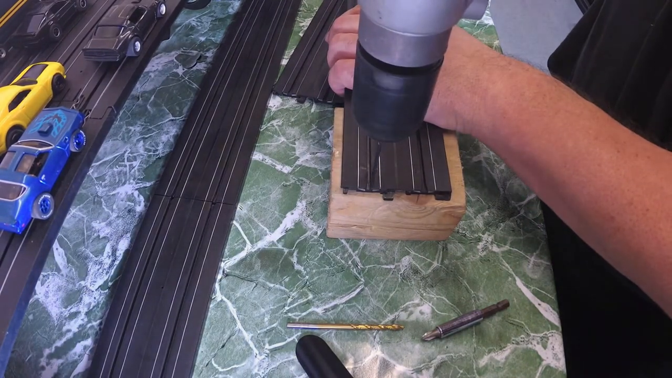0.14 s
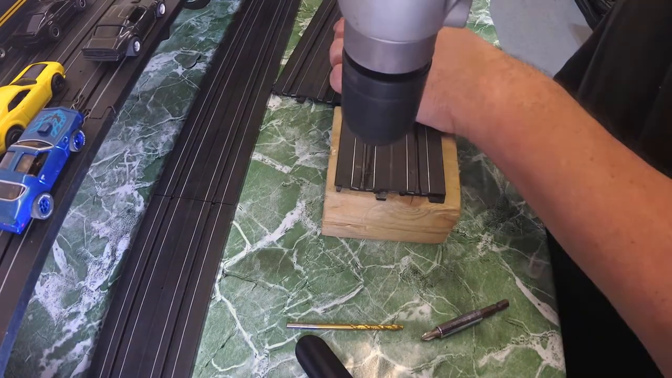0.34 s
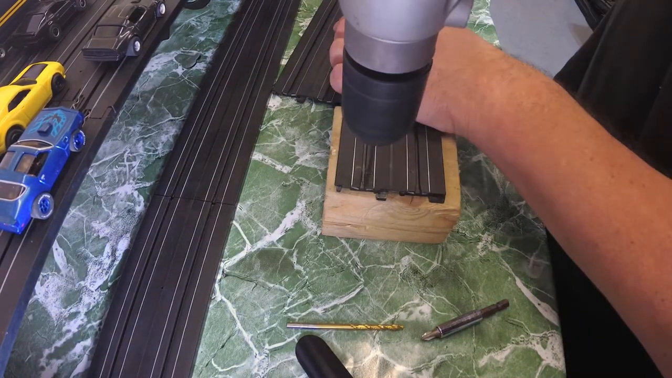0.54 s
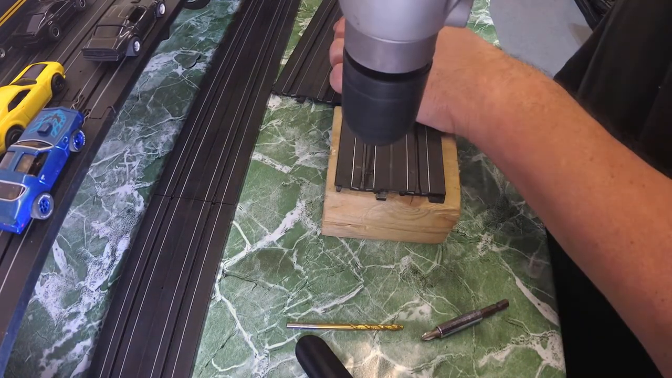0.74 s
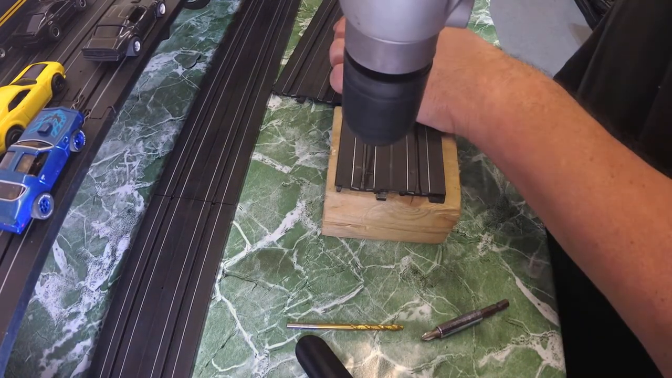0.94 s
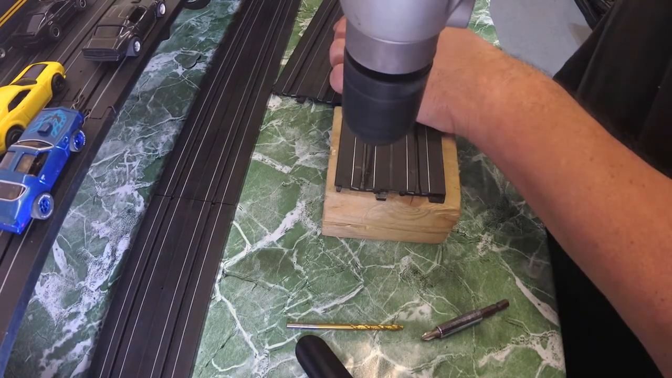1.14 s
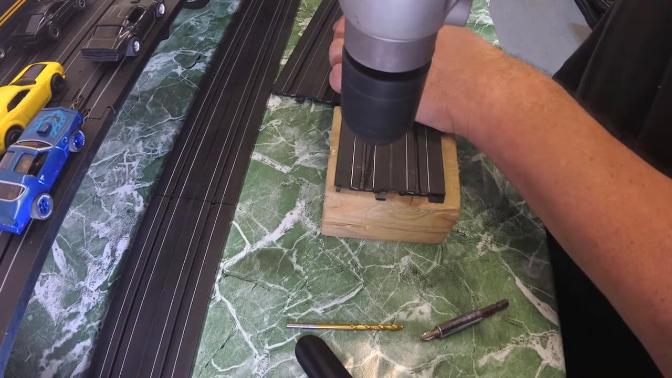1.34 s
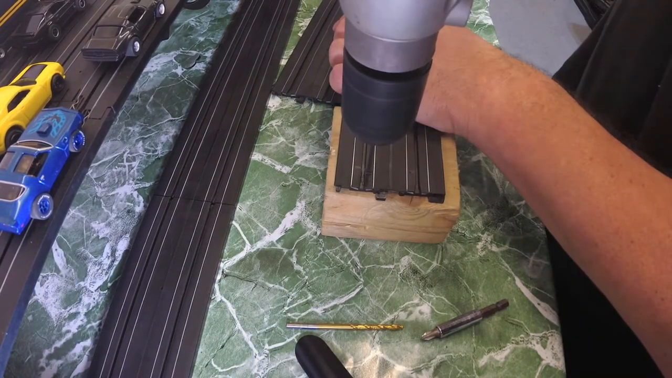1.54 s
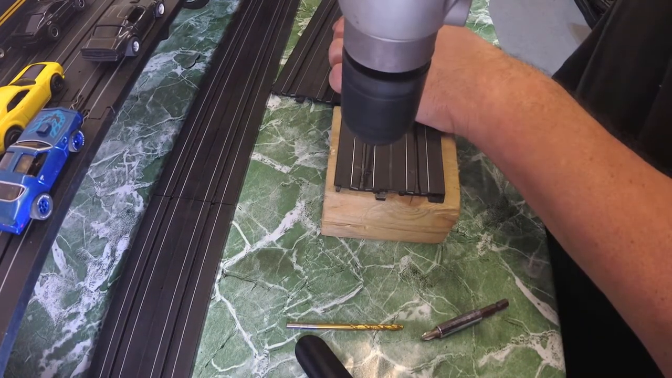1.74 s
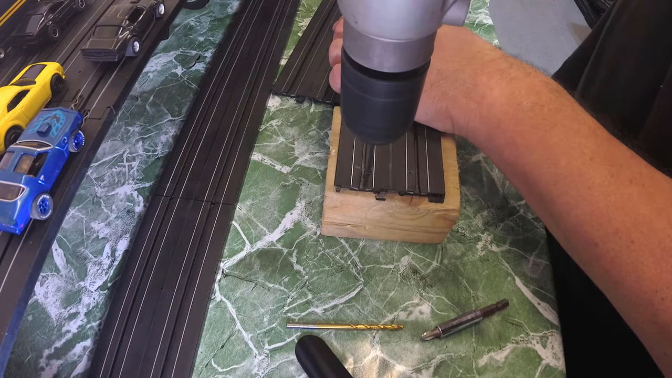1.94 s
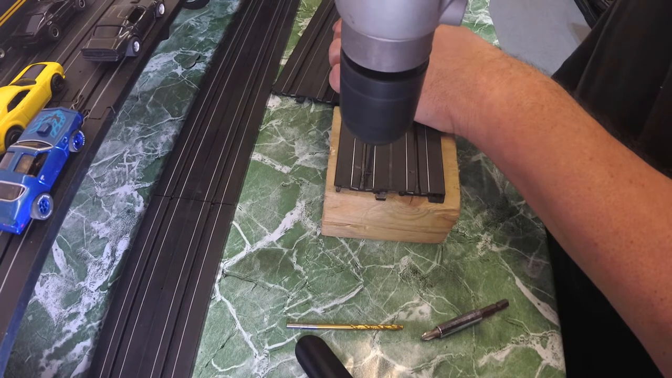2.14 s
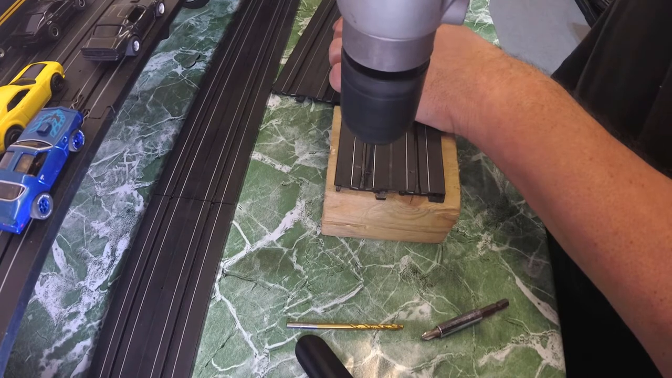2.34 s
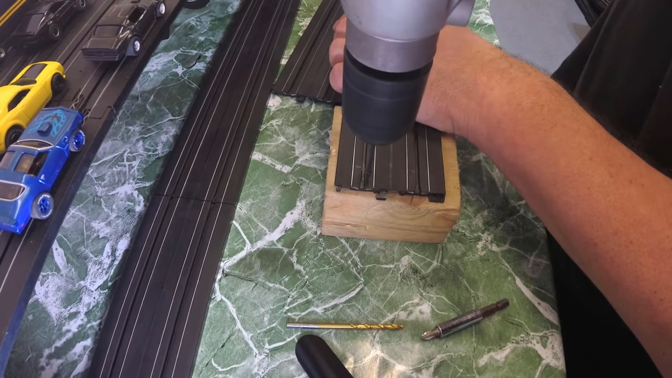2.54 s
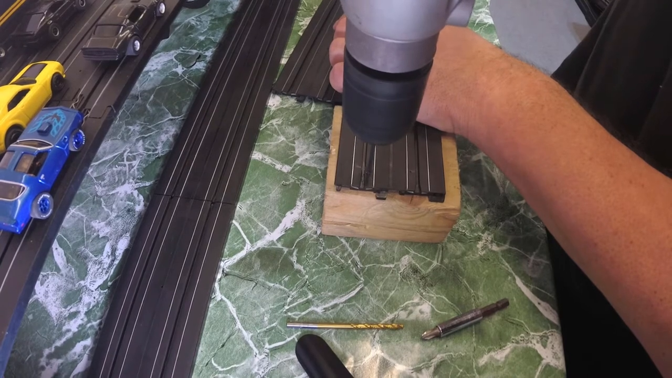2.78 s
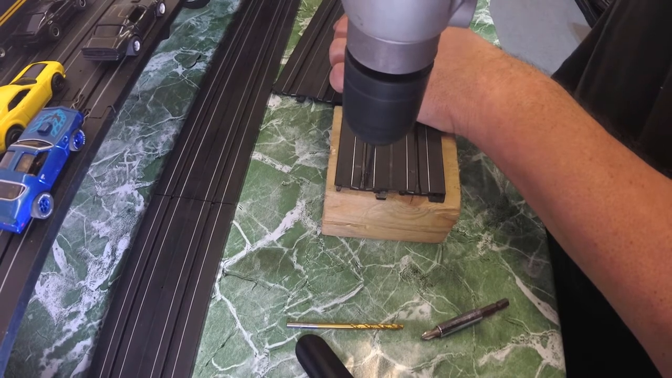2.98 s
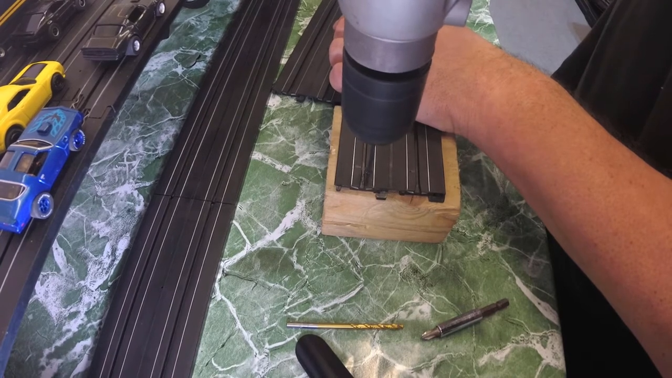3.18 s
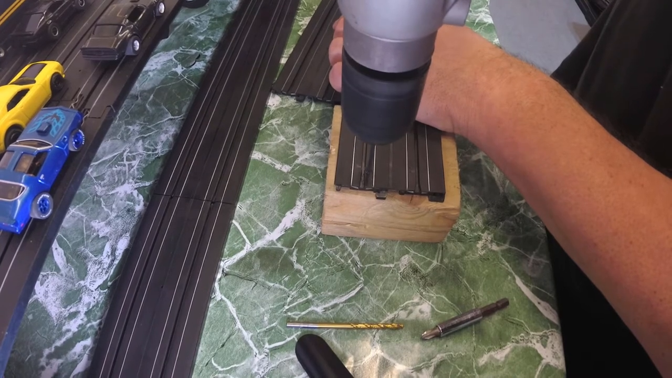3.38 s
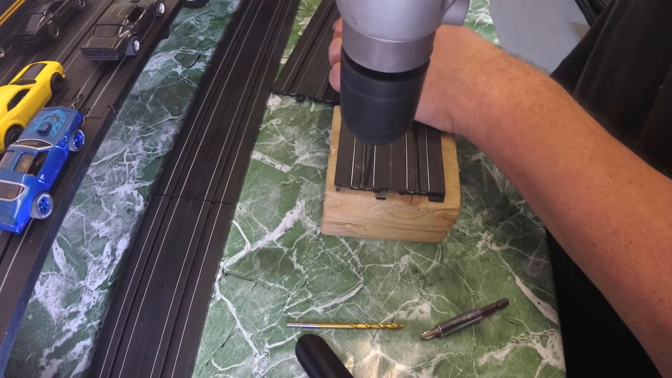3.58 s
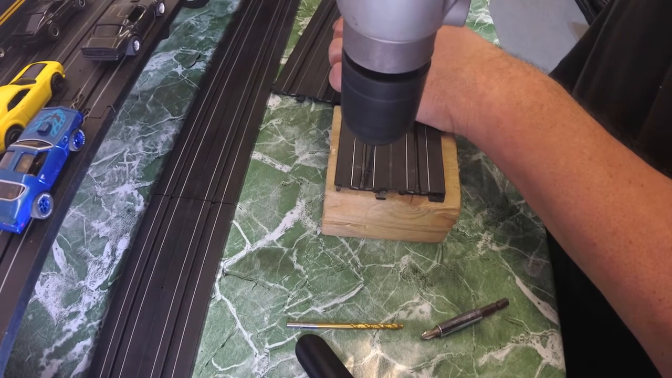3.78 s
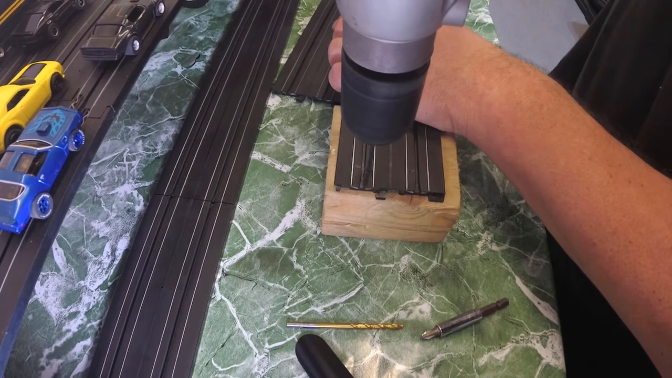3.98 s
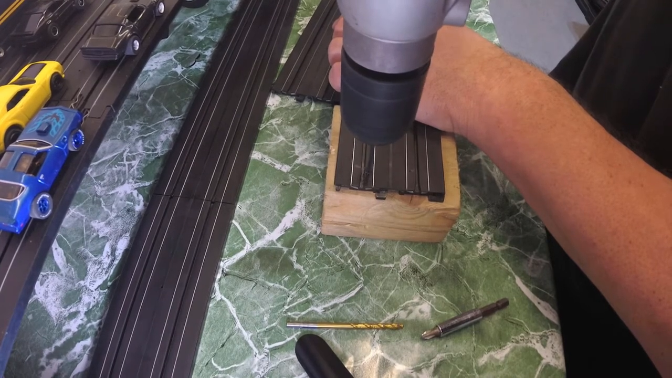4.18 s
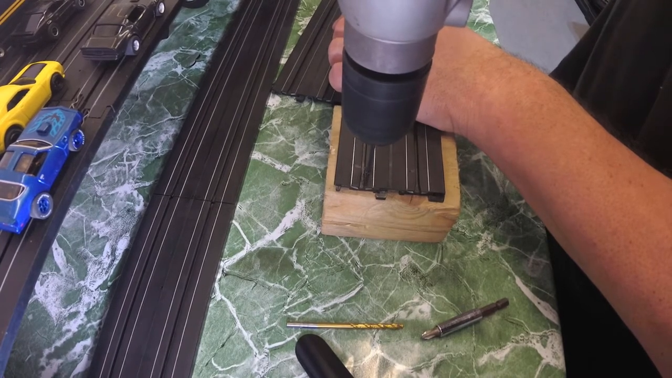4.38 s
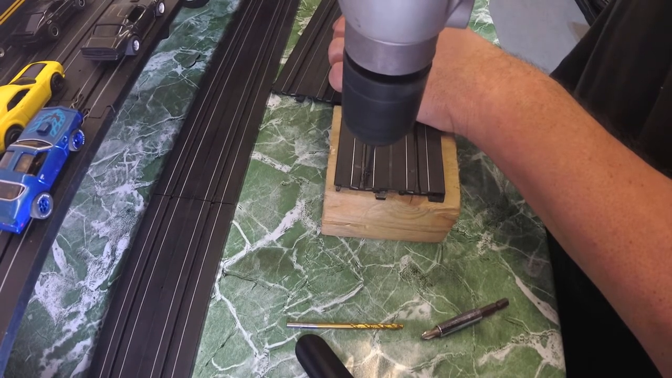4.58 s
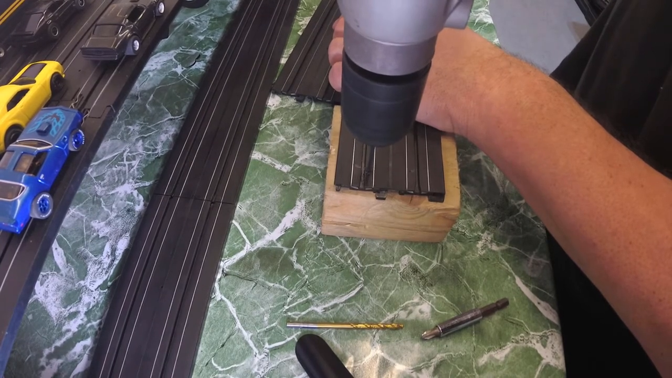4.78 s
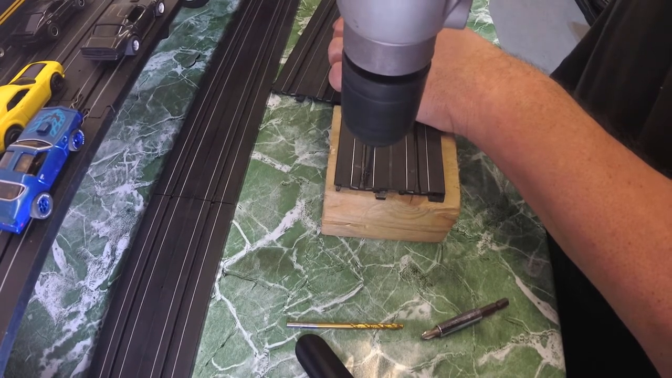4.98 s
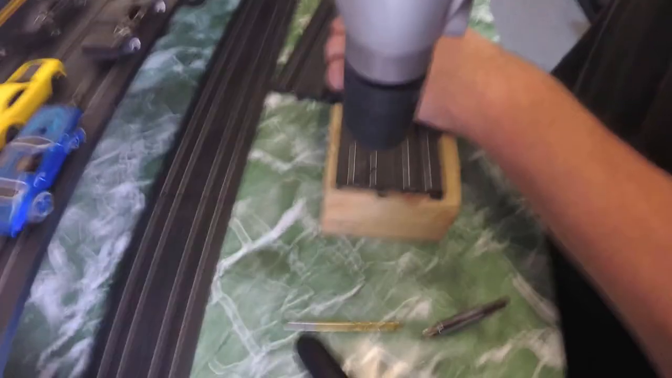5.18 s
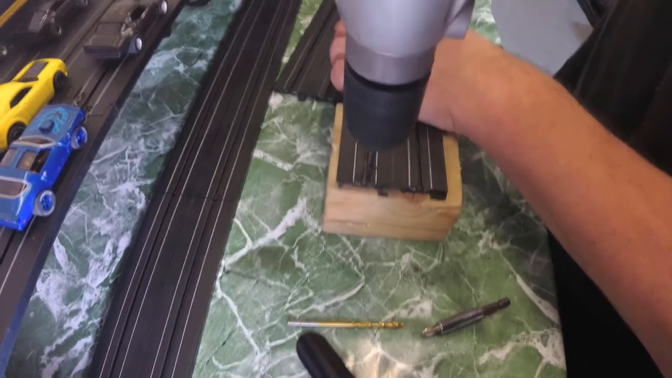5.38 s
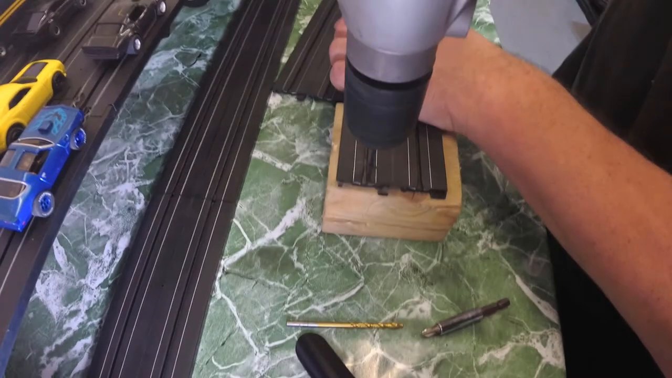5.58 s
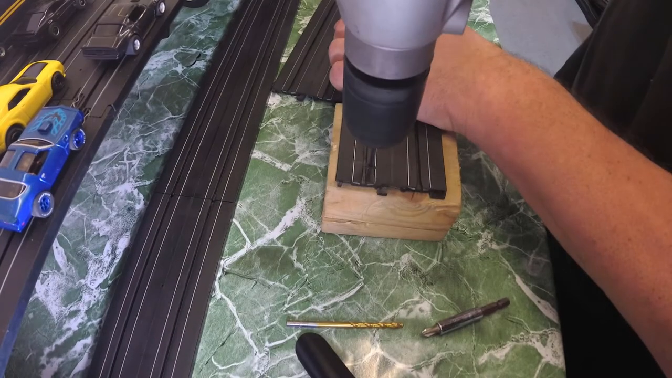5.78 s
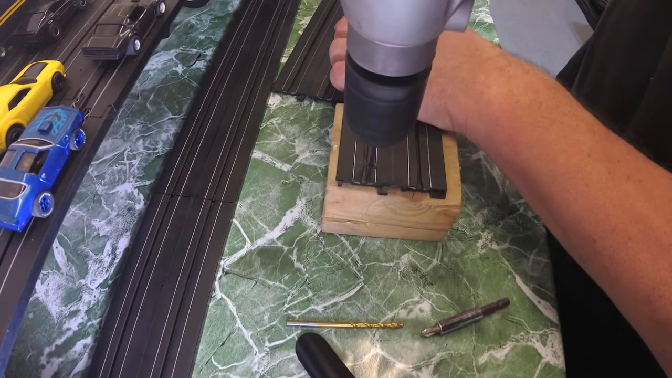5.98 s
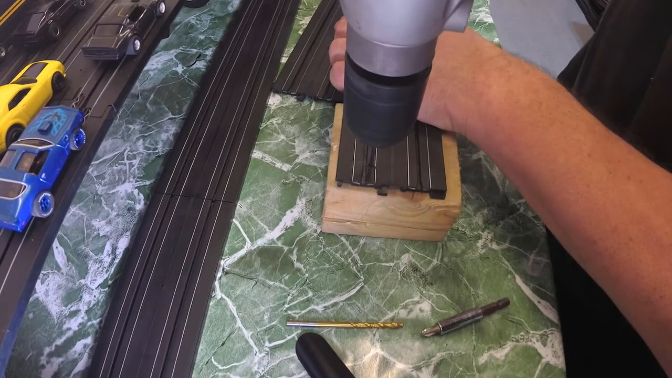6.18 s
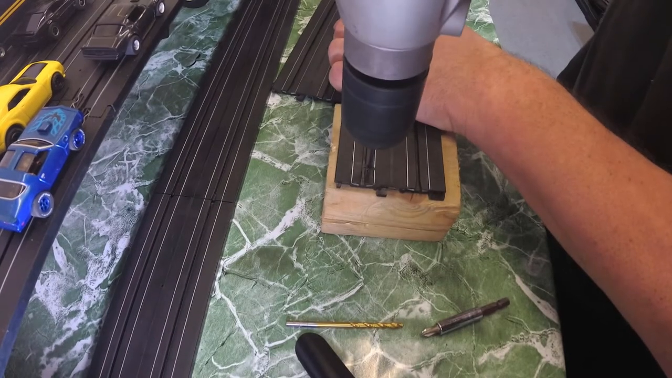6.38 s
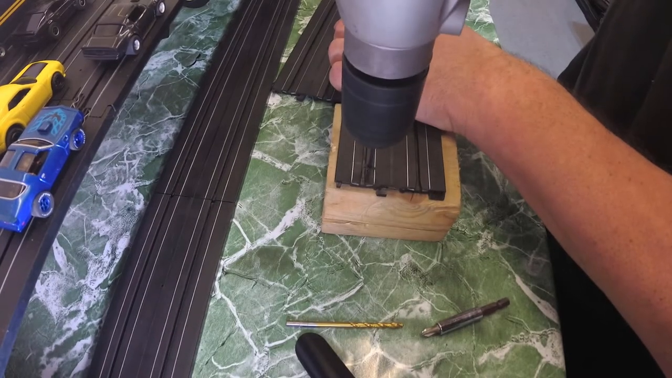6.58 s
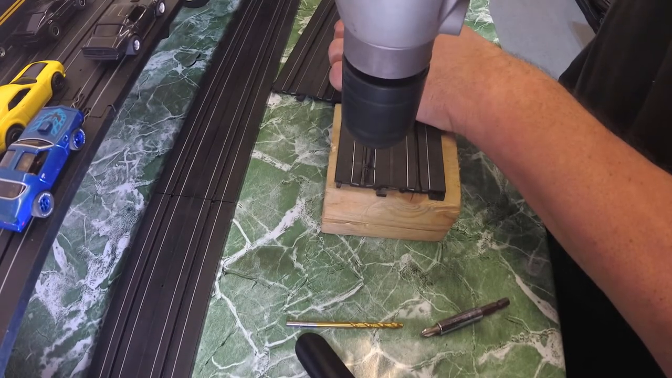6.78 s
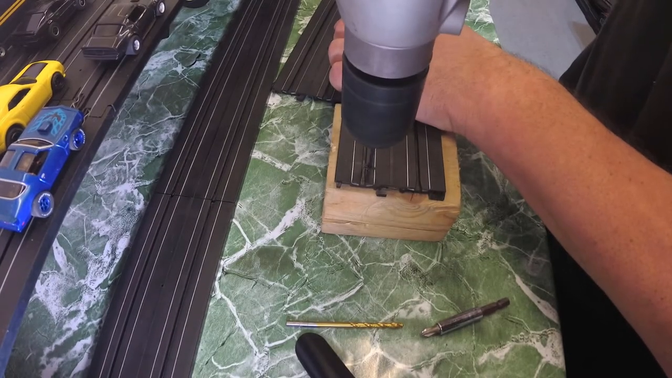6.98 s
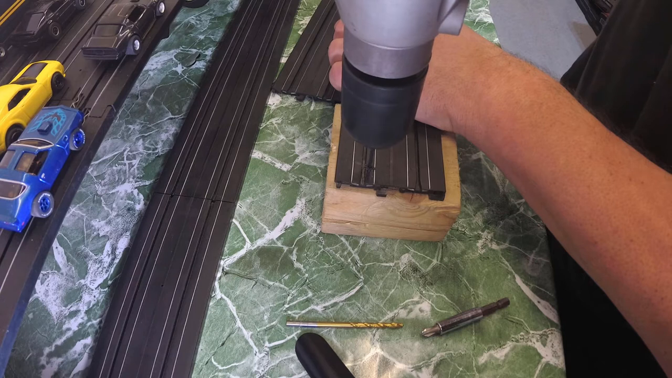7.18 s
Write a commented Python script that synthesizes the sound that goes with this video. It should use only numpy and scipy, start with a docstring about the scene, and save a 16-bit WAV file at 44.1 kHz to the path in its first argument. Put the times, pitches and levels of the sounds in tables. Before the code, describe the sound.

Close up in a room, a small drill is nearly silent, then clacks into gear and buzzes upward into a fast, rattling whir. It bores steadily through plastic on a wooden block for several seconds. A sharp wooden bump interrupts just past five seconds, then the power is released and the motor glides downward, its rattle thinning into loose ticks.

```python
"""A small mains drill, close to one microphone indoors, runs up, bores slowly and coasts down.
The bit goes through a plastic track piece on a wooden block; the gears rattle as knocks in the housing.
The motor buzzes in a burst of slot tone per mains cycle; commutator and slots whine as gliding sines.
Brushes and bit rub in fine grains. The table, as ringing modes, is bumped once, and rumbles as low noise.
The gears engage with a clack, the bit ticks at the bump and as it slows; the block groans at each drag."""
import sys
import numpy as np
from scipy import signal
from scipy.fft import rfft, irfft
from scipy.io import wavfile

SR = 44100
rng = np.random.default_rng(int(sys.argv[2]) if len(sys.argv) > 2 else 0)


def store_wav(level_fs):
    """Save 16-bit WAV to argv[1]."""
    pcm = np.round(np.clip(np.atleast_2d(level_fs), -1, 1) * 32767)
    wavfile.write(sys.argv[1], SR, pcm.T.astype(np.int16))


N = 318843
TIME = np.arange(N) / SR  # seconds

# Shaft orders that shake the housing.
# Each row: multiple of the shaft speed, level in dB at the housing's strongest resonance.
SHAFT_ORDERS = [(2, -34.5), (3, -44), (4, -33), (5, -44.5), (6, -34.5), (7, -38.5), (8, -35), (9, -33),
                (10, -33.5), (12, -50), (24, -44), (72, -26)]
# Broad response of the housing. Each row: frequency in Hz, level in dB.
HOUSING_BODY = [(30, -53), (140, -38), (180, -11.5), (300, -9), (850, 0.5), (1150, -4.5), (1700, -4.5),
                (3900, -5.5), (4300, -9.5), (5600, -14.5), (7900, -22.5), (11000, -26.5), (15300, -41.5)]
# Resonances of the housing. Each row: frequency in Hz, width in Hz, lift in dB.
HOUSING_MODES = [(389, 44, 4.8), (631, 80, 4.95), (953.3, 156, 8), (1094.4, 239, 14.74), (1267, 87, 5.1),
                 (1383, 228, 9.5), (2190, 310, 3.7), (2930, 110, 5.3), (3456, 122, 6), (3803, 284, 7.5),
                 (5150, 600, 4.9), (7420, 120, 4.5), (8320, 170, 6.5), (10400, 330, 3.9),
                 (13300, 1100, 8.1)]
# Whines of commutator and slots. Each row: multiple of the shaft speed, level in dB at top speed.
WHINES = [(30, -56.5), (72, -76)]
# Standing waves that a pure tone swells and fades through as it glides.
# Each row: frequency in Hz, width in Hz, lift in dB.
STANDING_WAVES = [(175, 30, 4), (215, 12, -9), (5170, 280, 11), (5600, 400, 6), (6340, 240, 11),
                  (6600, 70, 9), (6690, 50, -10), (6780, 80, 8), (6842, 14, 7), (6885, 32, 11.5),
                  (15680, 240, 14)]
# Run-up: the gap to top speed closes in a quick and a slow part.
# Each row: gap in turns per second, time constant in seconds.
RUN_UP = [(16.2, .17), (88, .6)]
# Broad spectrum of the rubbing brushes and bit. Each row: frequency in Hz, level in dB.
RUB_BODY = [(30, -42), (130, -15.5), (230, 0.5), (450, -4), (750, -8), (1800, -5.5), (2700, -0.5),
            (4300, -10), (7000, -19.5), (12000, -27.5), (15500, -30)]
# Resonances on the rubbing. Each row: frequency in Hz, width in Hz, lift in dB.
RUB_MODES = [(1040, 280, 11.8), (1425, 260, 10.6), (2188, 290, 10.2), (2580, 180, 5.2), (3803, 150, 7.9)]
# Bumps on the table.
# Each row: start in seconds, peak in dB, ring in seconds, share of the wooden knock from 0 to 1.
BUMPS = [(5.188, -19.5, 0.13, 0.01), (5.199, -32, 0.08, 0), (5.2055, -7, 0.092, 1)]
# Modes of the table. Each row: frequency in Hz, level in dB, factor on the ring time of the bump.
TABLE_MODES = [(29, -31, 6), (66, -24, 3), (101, -13, 1.45), (191, -11, 2.2), (284, -5, 0.99),
               (516, 14.5, 1.5), (597, 17.5, 0.83), (647, 21.5, 0.9), (1370, -6, .6), (1620, -7, .5)]
# A clack as the gears engage, then ticks of the bit at the bump and as it slows.
# Each row: start in seconds, peak in dB.
TICKS = [(.3532, -21), (5.2065, -14), (5.2105, -14), (6.698, -29), (6.824, -32), (6.9112, -18.5),
         (6.988, -31), (7.069, -37), (7.157, -23.5)]
# Spectrum of clack and ticks in the plastic. Each row: frequency in Hz, level in dB.
TICK_BODY = [(100, -29), (400, 1.5), (800, -15), (1300, 4), (1800, -1), (2300, 1), (3200, -8), (6000, -21),
             (15000, -48)]
# Places where the bit drags. Each row: middle in seconds, length in seconds, level in dB.
DRAGS = [(5.348, 0.3, -40.5), (6.554, 1, -49.5), (6.85, 0.061, -48), (7.171, 0.045, -44.5)]
# Spectrum of the wooden block. Each row: frequency in Hz, level in dB.
BLOCK_BODY = [(30, -30), (180, -38), (290, -4), (430, 6.5), (560, -4.5), (800, -30), (3000, -49)]
# Spectrum of the table's rumble. Each row: frequency in Hz, level in dB.
RUMBLE_BODY = [(20, -24), (40, -14), (58, -5.5), (85, -2), (115, 0), (160, -19), (400, -40)]
# How hard the hand leans on the drill. Each row: time in seconds, change of the rumble in dB.
LEAN = [(.6, 7.5), (1.3, 4), (2.1, -1.5), (2.7, 5), (4, 2), (4.5, -9), (5.7, 3), (6.4, 7), (7.2, 2)]

# the mains, and the place in its cycle where the current peaks (share of a cycle)
MAINS_HZ, CURRENT_PEAK = 60, .185
# the rattle sets in abruptly; later the trigger is let go
ONSET_S, LET_GO_S = .353, 5.43
# the current builds up after a short lag and dies quickly
CURRENT_LAG_S, CURRENT_RISE_S, CURRENT_FALL_S = 0.051, 0.55, 0.052
# shaft turns per second: creeping at first, and flat out
CREEP_HZ, TOP_HZ = 70, 229.86
# the deepening hole drags the shaft down, with the square of the time since the bit bites
BITE_S, SAG_HZ_PER_S2 = 3.4, .8
# coasting: friction brakes the shaft, less as it slows
BRAKE_HZ_PER_S, BRAKE_EASE_S = 120, 4
# shaft turns per spindle turn
GEAR_RATIO = 13.3
# gear rattle: level flat out, shaft speed at which it dies, power of the speed above that
RATTLE_DB, QUIET_HZ, RATTLE_POWER = -23.5, 50, 1.61
# the bump jolts the gears, which rattle harder for a moment
JOLT_DB, JOLT_S = 3.5, 0.12
# motor tones: the slot buzz, its extra under full load, and the once-a-turn hum
BUZZ_DB, BUZZ_LOAD_DB, HUM_DB = -28.5, 15, -47.5
# the power of speed that the whines follow, and their extra when coasting
WHINE_POWER, WHINE_COAST_DB = 1.3, 3
# delay of the reflection from a nearby surface
ECHO_S = .006
# rubbing: level flat out, power of speed, extra under full load
RUB_DB, RUB_POWER, RUB_LOAD_DB = -37.5, 0.31, 11.5
# table rumble: level flat out before the leaning, power of speed
RUMBLE_DB, RUMBLE_POWER = -64, 2.7
# upper edge of the recorder's band
EDGE_HZ = 15700


def gears(turns, housing, repeat=0.43, coasting=0.47, flutter_db=0.5, thinning=3.8):
    """Teeth knock at random, and partly in a pattern that comes round with each spindle turn."""
    count = 200  # knocks in the pattern
    pattern = impacts(count, share=.9, spread_db=6.5)
    tooth = np.floor(turns / GEAR_RATIO * count).astype(int)
    meets = np.diff(tooth, prepend=0)
    patterned = unit(meets * pattern[tooth % count] * (1 + 0.17 * drift(15)))
    # as the shaft slows, the knocks thin out into single grains
    share = .2 * pace() ** thinning
    loose = unit(impacts(N, share, spread_db=2.5) / np.sqrt(share))
    # the slower the gears, the more faithfully the pattern repeats: a comb of gliding tones
    regular = repeat + coasting * np.clip((225 - speed()) / 50, 0, 1)
    teeth = (loose + regular * patterned) / np.hypot(1, regular)
    teeth = teeth * amp(flutter_db * drift(30))
    knocking = airy(teeth, air_hz=4170) * (TIME > ONSET_S)
    return unit(through(knocking, housing)) * amp(RATTLE_DB) * effort()


def shaft_orders(turns, housing, waver=0.45, smear=0.08, follow=0.62, unpowered_db=-5):
    """Multiples of the shaft speed shake the housing and ring in it."""
    orders = np.zeros(N)
    for multiple, db in SHAFT_ORDERS:
        level = amp(db) * (1 + waver * drift(14.0))
        orders += level * np.sin(2 * np.pi * (round(multiple) * turns + smear * drift(22)))
    # the orders swell and fade with the rattle, and weaken without current
    level = effort() ** follow * amp(unpowered_db * (1 - current()))
    return np.sqrt(2) * through(orders * level * (TIME > ONSET_S), housing)


def rotor_hum(turns):
    """The rotor hums once a turn while current flows, and standing waves colour it."""
    level = amp(HUM_DB + lifts(speed(), STANDING_WAVES)) * current() * (1 + 0.24 * drift(5.9))
    return np.sqrt(2) * level * np.sin(2 * np.pi * turns)


def whines(turns):
    """Commutator and slots whine thinly, gliding with the shaft through the standing waves."""
    tones = np.zeros(N)
    for multiple, db in WHINES:
        level = amp(db + lifts(round(multiple) * speed(), STANDING_WAVES))
        tones += level * np.sin(2 * np.pi * round(multiple) * turns + 0.29 * drift(40))
    level = pace() ** WHINE_POWER * amp(WHINE_COAST_DB * (TIME > LET_GO_S))
    return np.sqrt(2) * tones * level * (1 + 0.12 * drift(25))


def buzz(turns, conduction=0.32, ring_hz=2510, lean=0.48, chirp_hz=1350, echo=0.27, uneven=0.042,
         free_hz=250):
    """The trigger lets current flow once per mains cycle; each burst sounds the slot tone in the stator."""
    slots, cycle = 12, mains()
    # a burst lasts the conducting share of the cycle
    burst = np.cos(np.pi * np.clip(cycle / conduction, -.5, .5)) * (1 + uneven * drift(40))
    # the stator's resonance draws the pitch towards itself
    pull_hz = lean * (ring_hz - slots * speed())
    # below its free-running speed the motor makes each burst chirp down
    fall_hz = chirp_hz * (1 - speed() / free_hz) * cycle / conduction
    bend = (pull_hz - fall_hz) * cycle / MAINS_HZ
    tone = unit(burst * np.sin(2 * np.pi * (slots * turns + bend + 0.053 * drift(30))))
    # a nearby surface throws each burst back
    reflection = echo * np.interp(TIME - ECHO_S, TIME, tone)
    return (tone + reflection) * current() * amp(BUZZ_DB + BUZZ_LOAD_DB * load())


def rubbing(spark=0.58, grit=0.19):
    """Brushes and bit stick and slip in fine grains."""
    # the brushes fizz more once per mains cycle, until the trigger is let go
    fizz = spark * np.exp(-((mains() - .08) / 0.25) ** 2) * (TIME < LET_GO_S)
    pressure = 1 + grit * drift(110) + fizz
    grains = airy(impacts(N, share=.15, spread_db=3.5) * pressure, air_hz=4870)
    level = pace() ** RUB_POWER * amp(RUB_DB + RUB_LOAD_DB * load())
    return unit(through(grains, response(RUB_BODY, RUB_MODES))) * level


def ticks(tail=0.072, t60=.025):
    """The gears' clack and the bit's ticks: each a click with a short noisy tail, ringing as plastic."""
    out, t = np.zeros(N), TIME[:SR // 2]
    plastic = response(TICK_BODY)
    for start, db in TICKS:
        snap = (t == 0) + tail * rng.standard_normal(len(t)) * amp(-60 * t / t60) / 2
        tick = through(snap, plastic)
        add(out, start, amp(db) * tick / abs(tick).max())
    return out


def bumps(knock_hz=400):
    """Bumps ring the modes of the table; the wooden knock is the part above knock_hz."""
    out, t = np.zeros(N), TIME[:SR // 2]
    for start, db, ring, hard in BUMPS:
        modes = np.zeros(len(t))
        for hz, level, life in TABLE_MODES:
            decay = amp(level - 60 * t / (ring * life))
            modes += decay * (hard if hz > knock_hz else 1) * np.sin(2 * np.pi * hz * t)
        add(out, start, amp(db) * modes / abs(modes).max())
    return out


def groan():
    """The bit slips in the hole and the wooden block answers low."""
    slips = impacts(N, share=.05, spread_db=3)
    level = sum(amp(db) * np.exp(-(2 * (TIME - s) / length) ** 2) for s, length, db in DRAGS)
    return unit(through(slips, response(BLOCK_BODY))) * level


def rumble():
    """The table shakes more as the drill runs faster and is leant on harder."""
    shake = unit(through(rng.standard_normal(N), response(RUMBLE_BODY)))
    return shake * pace() ** RUMBLE_POWER * amp(RUMBLE_DB + curve(LEAN))


def speed():
    """Shaft turns per second: creep, run-up, a slight sag in the hole, then coasting."""
    driven, coasting = np.minimum(TIME, LET_GO_S), np.maximum(TIME - LET_GO_S, 0)
    gap = sum(hz * np.exp((ONSET_S - driven) / s) for hz, s in RUN_UP)
    sag = SAG_HZ_PER_S2 * np.maximum(driven - BITE_S, 0) ** 2
    braked = BRAKE_HZ_PER_S * BRAKE_EASE_S * (1 - np.exp(-coasting / BRAKE_EASE_S))
    return np.maximum(TOP_HZ - gap - sag, CREEP_HZ) - braked


def pace():
    """Shaft speed as a share of top speed."""
    return speed() / TOP_HZ


def load():
    """How hard the motor pulls, 0-1: the speed it still lacks, from the onset until the trigger is let go."""
    return (1 - pace()) * (TIME > ONSET_S) * (TIME < LET_GO_S)


def current():
    """Motor current, 0-1: rise, hold, quick fall."""
    rise = np.clip((TIME - ONSET_S - CURRENT_LAG_S) / CURRENT_RISE_S, 0, 1)
    return rise * np.clip(1 - (TIME - LET_GO_S) / CURRENT_FALL_S, 0, 1)


def effort():
    """Force of the gear teeth, 1 flat out: it grows with speed, and briefly with the bump."""
    since = TIME - BUMPS[0][0]
    jolt_db = JOLT_DB * np.exp(-abs(since) / JOLT_S) * (since > 0)
    drive = np.maximum((speed() - QUIET_HZ) / (TOP_HZ - QUIET_HZ), 0)
    return drive ** RATTLE_POWER * amp(jolt_db)


def mains():
    """Place in the mains cycle, -.5 to .5, with 0 where the current peaks."""
    return (TIME * MAINS_HZ - CURRENT_PEAK + .5) % 1 - .5


def impacts(count, share, spread_db):
    """Sparse knocks of uneven size, rms 1."""
    size = rng.standard_normal(count) * amp(spread_db * rng.standard_normal(count).clip(-2, 2))
    return unit(size * (rng.random(count) < np.clip(share, 0, 1)))


def airy(grains, air_hz, air_power=.3):
    """Grains carry the low and middle range; rushing air takes over above and grows with speed."""
    air = signal.lfilter(*signal.butter(2, air_hz, "high", fs=SR), rng.standard_normal(N))
    low = signal.lfilter(*signal.butter(2, air_hz, fs=SR), unit(grains))
    return low + air * pace() ** air_power


def lifts(hz, modes):
    """Decibels that bell-shaped resonances add at a frequency."""
    return sum(lift * np.exp(-(2 * (hz - f) / width) ** 2) for f, width, lift in modes)


def response(body, modes=(), size=4096):
    """Causal impulse response of a broad spectrum with resonances on it; top gain 1."""
    hz = abs(np.fft.fftfreq(size, 1 / SR))
    at, level = np.transpose(body)
    db = np.interp(np.log(hz + 1), np.log(at), level) + lifts(hz, modes)
    # minimum phase: the Hilbert transform of the log gain gives the phase
    log_gain = np.log(amp(db - db.max()))
    return np.fft.ifft(np.exp(np.conj(signal.hilbert(log_gain)))).real


def through(x, ring):
    """Passes a sound through an impulse response."""
    return signal.oaconvolve(x, ring)[:N]


def drift(hz):
    """Slow random wander of rms 1, up to a rate."""
    spectrum = rfft(rng.standard_normal(N))
    return unit(irfft(spectrum / (1 + (np.fft.rfftfreq(N, 1 / SR) / hz) ** 4), N))


def curve(rows):
    """Joins (time, value) rows by straight lines."""
    return np.interp(TIME, *np.transpose(rows))


def amp(db):
    """Decibels to gain."""
    return 10 ** (np.asarray(db) / 20)


def unit(x):
    """Scales to rms 1."""
    return x / np.sqrt(np.mean(x ** 2) + 1e-20)


def add(mix, start, sound):
    """Mixes a sound in at a time in seconds."""
    part = mix[round(start * SR):][:len(sound)]
    part += sound[:len(part)]


def scene():
    """One shaft speed drives every part of the drill; both channels carry the same sound."""
    turns = np.cumsum(speed()) / SR
    housing = response(HOUSING_BODY, HOUSING_MODES)
    drill = gears(turns, housing) + shaft_orders(turns, housing) + rotor_hum(turns) + whines(turns)
    drill = drill + buzz(turns) + rubbing()
    mono = drill + ticks() + bumps() + groan() + rumble()
    return np.array([mono, mono])


def record(dry):
    """The recorder's band limit."""
    lowpass = signal.firwin(511, EDGE_HZ, window=("kaiser", 9), fs=SR)
    return signal.oaconvolve(dry, lowpass[None], "same")


dry = scene()
out = record(dry)
store_wav(out)
```